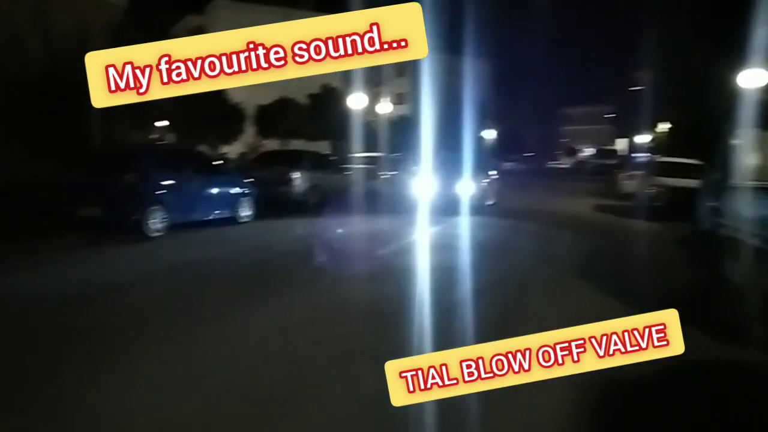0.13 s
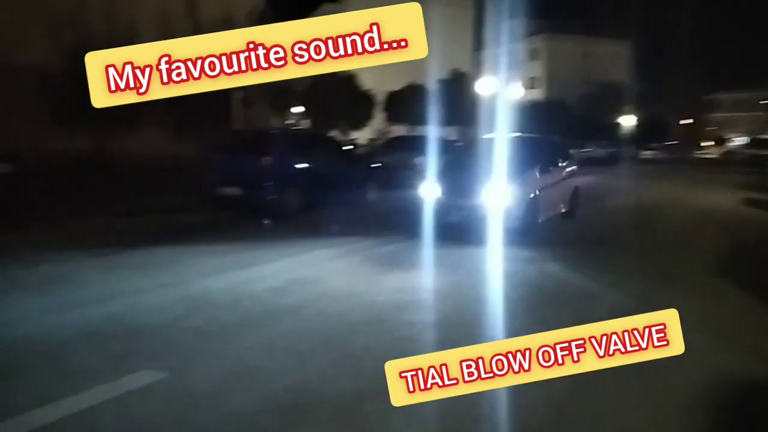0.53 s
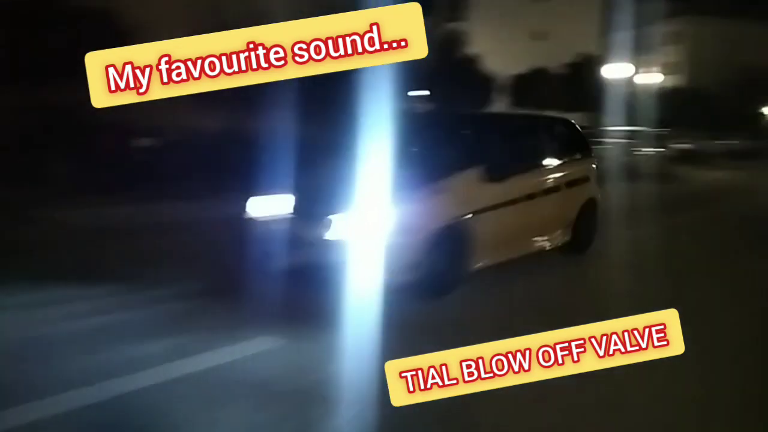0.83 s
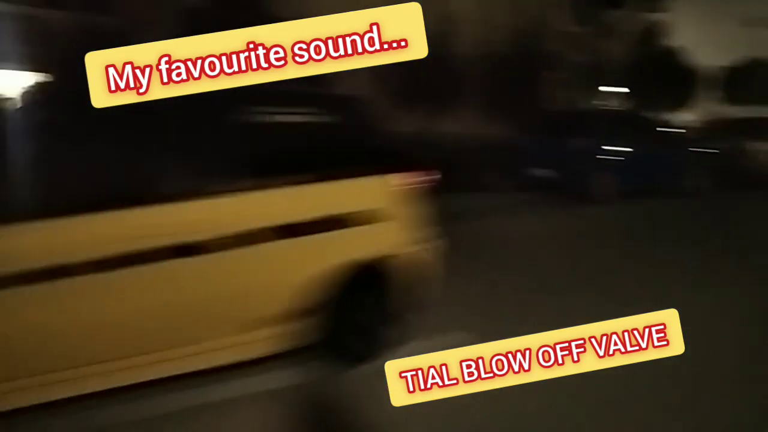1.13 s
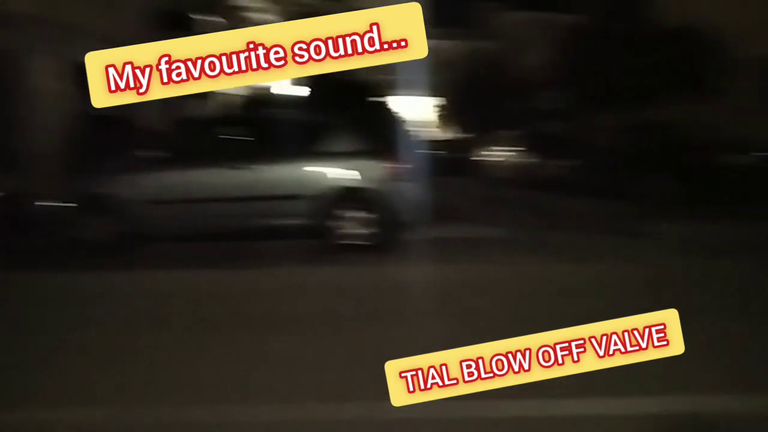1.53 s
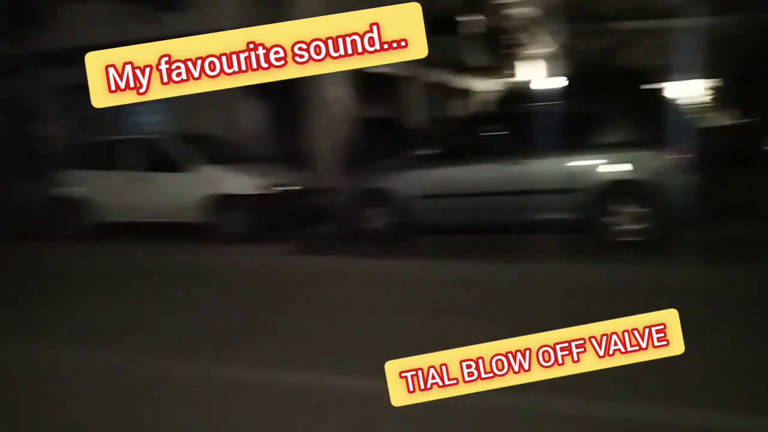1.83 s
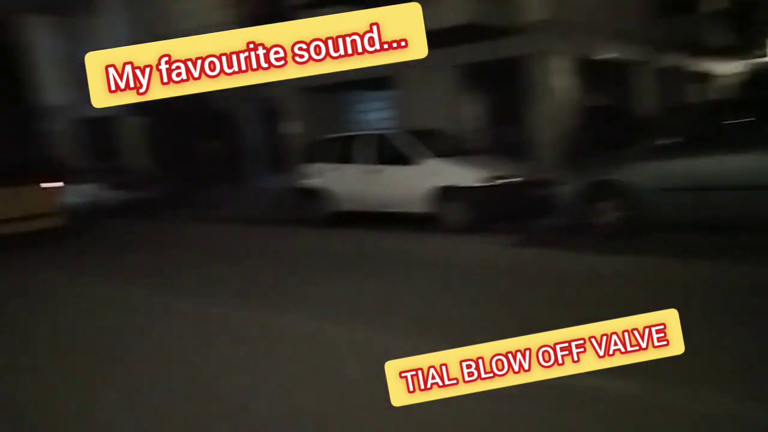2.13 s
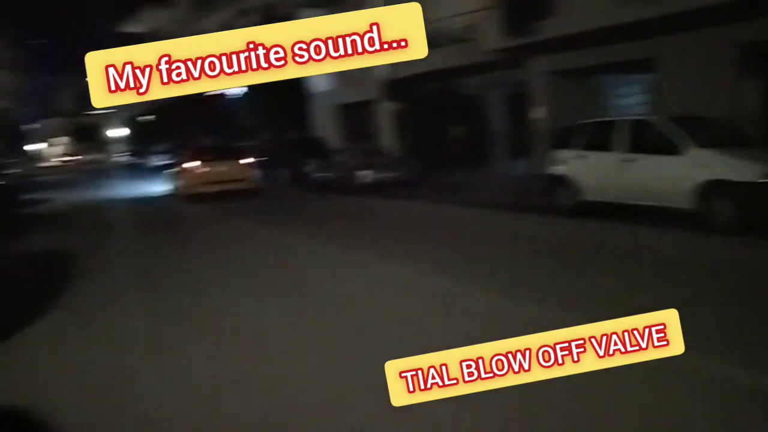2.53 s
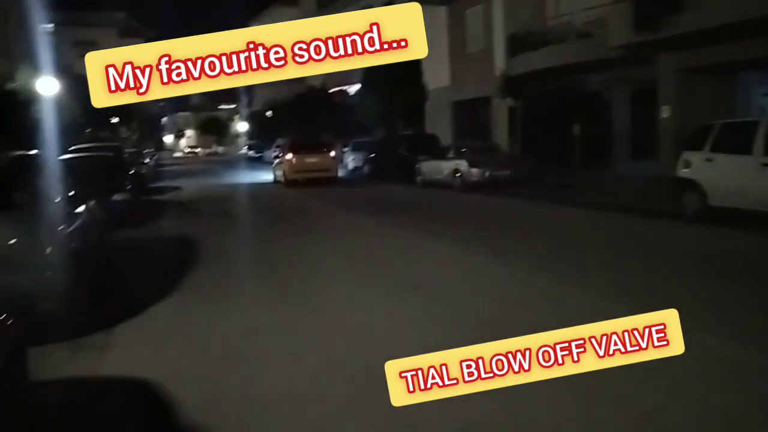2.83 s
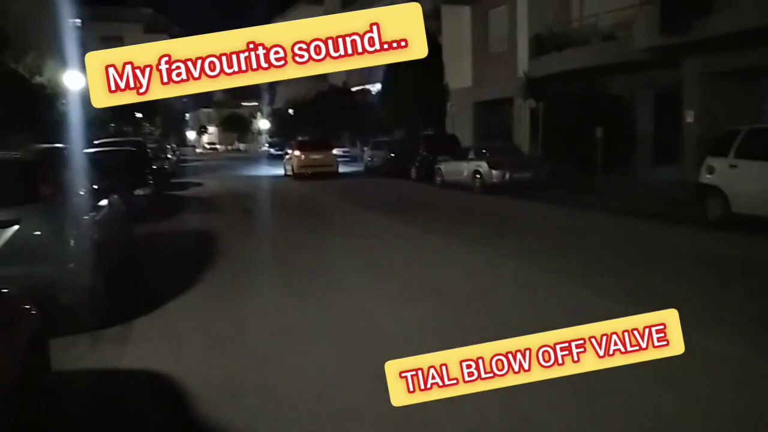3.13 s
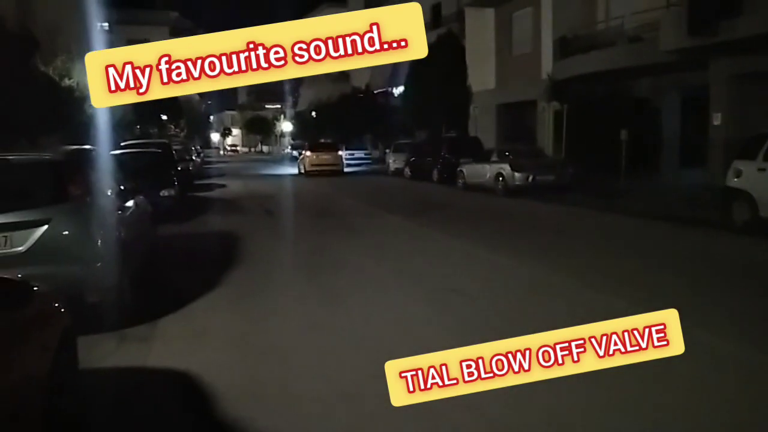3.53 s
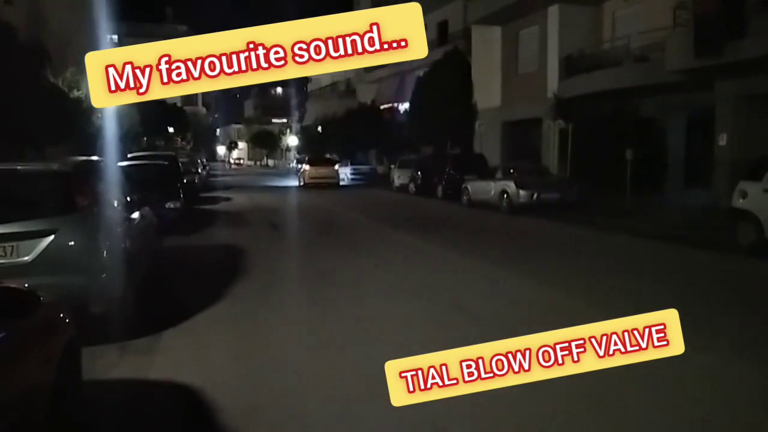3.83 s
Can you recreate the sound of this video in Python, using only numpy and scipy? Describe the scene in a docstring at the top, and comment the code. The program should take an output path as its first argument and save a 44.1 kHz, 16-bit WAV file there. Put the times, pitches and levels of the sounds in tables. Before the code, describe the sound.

A turbocharged car on full boost whistles high, lifts off with a sharp blast of vented air, sweeps close past a handheld microphone on a built-up street, then drones and burbles away.

```python
"""Turbo car lifts off and passes by

A turbocharged four-cylinder car comes down a night street on full boost and passes close by.
The throttle shuts: a valve vents with a long hiss of shaped noise and the turbo's sine whistle spins down.
The exhaust, a stack of cosines at the firing rate, drones as the tail swings past, then burbles unevenly.
Bands of shaped noise make the intake, tyres, wake and rumble; a few faint ticks sound near the microphone."""
import sys
import numpy as np
from scipy import signal
from scipy.fft import rfft, irfft
from scipy.io import wavfile
from scipy.ndimage import uniform_filter1d

SR = 44100
rng = np.random.default_rng(int(sys.argv[2]) if len(sys.argv) > 2 else 0)


def store_wav(level_fs):
    """Save 16-bit WAV to argv[1]."""
    pcm = np.round(np.clip(np.atleast_2d(level_fs), -1, 1) * 32767)
    wavfile.write(sys.argv[1], SR, pcm.T.astype(np.int16))


N = 176400
T = np.arange(N) / SR
LIFT_S = 0.23  # the moment the throttle starts to shut

# Firing rate of the engine as heard. Each row: time in seconds, rate in Hz.
FIRING_RATE = [(0, 152.5), (.06, 156.4), (.22, 158.6), (.28, 149), (.33, 123), (.43, 117), (.6, 107),
               (.87, 97), (1.07, 87.7), (1.25, 76.8), (1.5, 61), (1.62, 60), (1.89, 66.7), (2.12, 63),
               (2.3, 55), (2.6, 41.3), (2.8, 39.5), (3.26, 32.8), (3.48, 32), (4, 36)]
# Pitch of the turbo whistle. Each row: time in seconds, pitch in Hz.
WHISTLE_PITCH = [(0, 7600), (.08, 7740), (.22, 7860), (.265, 7620), (.32, 6960), (.39, 6300), (.5, 5480),
                 (.7, 4170), (.82, 3550), (1.22, 2420), (1.45, 1680)]
# Tone difference of the two microphone ports. Each row: frequency in Hz, left minus right in dB.
PORT_BALANCE = [(100, 2.5), (550, 2), (1000, -3.5), (1600, -1.5), (2500, -4.5), (3500, 1), (4300, -3),
                (5100, -8.5), (5800, -8.5), (7300, -8.5), (9000, -3), (11000, -1), (13700, 5.5)]
# Direction of the car. Each row: time in seconds, delay of the left port in ms.
LEFT_LAG = [(0, 0.15), (.9, 0.038), (1.35, 0.43), (1.6, 0.48), (4, 0.26)]


def amp(db):
    """Turns decibels into gain."""
    return 10 ** (np.asarray(db) / 20)


def unit(x):
    """Scales a signal to rms 1."""
    return x / np.sqrt(np.mean(x ** 2) + 1e-20)


def unit_of(x):
    """Rms of the middle (the mean of both sides) of a stereo pair."""
    return np.sqrt(np.mean(x.mean(0) ** 2) + 1e-20)


def curve(rows):
    """Reads a time table at every sample, with straight lines between its rows."""
    return np.interp(T, *np.transpose(rows))


def read(points, hz):
    """Reads a spectrum table on a log-frequency axis."""
    f, value = np.transpose(points)
    return np.interp(np.log(hz + 1), np.log(f + 1), value)


def port_gain(hz):
    """Gain of the left port at a frequency; the right port gets the inverse."""
    return amp(read(PORT_BALANCE, hz) / 2)


def drift(rate_hz):
    """Random motion of rms 1 that weakens above the given rate."""
    coarse = np.arange(0, N, 64)
    hz = np.fft.rfftfreq(len(coarse), coarse[1] / SR)
    spectrum = rfft(rng.standard_normal(len(coarse))) / (1 + (hz / rate_hz) ** 4)
    slow = irfft(spectrum, len(coarse))
    return np.interp(np.arange(N), coarse, unit(slow))


def rush(spectrum, patchy_db, size=512):
    """Turbulent noise at both ports, arriving from the direction of the car; its middle has rms 1."""
    # Likeness of the two ports. Each row: frequency in Hz, likeness from 0 to 1.
    likeness = [(350, 1), (650, 0.5), (1300, 0.34), (3400, 0.068), (5000, 0.26), (14000, .15)]
    hop = size // 4
    frames, hz = N // hop + 5, np.fft.rfftfreq(size, 1 / SR)
    a, b, c, d, patches = rng.standard_normal((5, frames, len(hz)))
    # smoothing over time and frequency leaves louder and softer patches
    patches = uniform_filter1d(patches, size=12, axis=0)
    patches = unit(uniform_filter1d(patches, size=7, axis=1))
    lag_s = np.interp(np.arange(frames) * hop / SR, *np.transpose(LEFT_LAG))[:, None] / 1000
    turn = np.exp(-2j * np.pi * hz * lag_s)  # delays the left port
    same, side = np.clip(read(likeness, hz), 0, 1), port_gain(hz)
    shared, separate = a + 1j * b, c + 1j * d
    left = shared * side * turn
    right = (same * shared + np.sqrt(1 - same ** 2) * separate) / side
    shaped = np.array([left, right]) * amp(read(spectrum, hz) + patchy_db * patches)
    _, x = signal.istft(shaped, nperseg=size, noverlap=size - hop, time_axis=-2, freq_axis=-1)
    x = x[:, :N]
    return x / unit_of(x)


def street(x, wet_db, t60):
    """Direct sound plus scattered echoes from house fronts and parked cars."""
    t = np.arange(SR // 2) / SR
    strength = rng.standard_normal((2, len(t)))
    present = rng.random((2, len(t))) < 2000 / SR  # about 2000 echoes per second
    taps = strength * present * amp(-60 * t / t60)
    taps /= np.linalg.norm(taps, axis=1, keepdims=True)
    echoes = signal.fftconvolve(x[None], taps, axes=1)[:, :N]
    return (x + amp(wet_db) * echoes) / np.hypot(1, amp(wet_db))


def throttle():
    """Gain of what sounds only under load: full until the lift, then falling at 342 dB per second."""
    return amp(-342 * np.maximum(T - LIFT_S, 0))


def firing_phase():
    """Angle in radians that turns once for every firing."""
    return 2 * np.pi * np.cumsum(curve(FIRING_RATE)) / SR


def handling():
    """Faint ticks close to the microphone: noise around a centre pitch that starts at once and dies away."""
    # Each row: start in seconds, level in dB, centre in Hz, decay time in seconds.
    ticks = [(2.328, -50.5, 6800, 0.0054), (3.341, -49.5, 6000, 0.00099), (3.764, -56, 1500, .012)]
    out = np.zeros((2, N))
    for start, db, hz, decay in ticks:
        # the spectrum falls away on both sides of its centre
        shape = [(hz / 4, -22), (hz, 0), (hz * 4, -44)]
        envelope = (T >= start) * np.exp(-abs(T - start) / decay)
        out += rush(shape, patchy_db=0, size=256) * amp(db) * envelope
    return out


def road():
    """Tyre roar near and far, the wake behind the car, and rumble that throbs with the firing."""
    # Tyres on asphalt. Each row: frequency in Hz, level in dB per Hz.
    tyre_tone = [(200, 7), (700, -0.5), (1200, 3), (1800, -2.5), (2400, -7), (3100, -8), (4500, -20),
                 (9000, -56)]
    # Level of the tyres. Each row: time in seconds, level in dB.
    tyre_level = [(0, -40), (.3, -32), (.6, -37.5), (.9, -34.5), (1.17, -34), (1.4, -43.5), (2.1, -46),
                  (3, -54), (4, -68)]
    # Far road roar that stays in the street. Each row: frequency in Hz, level in dB per Hz.
    far_tone = [(200, -2), (480, -2.5), (720, -11.5), (1250, 2.5), (1680, -19), (2000, -4.5), (2400, -23),
                (2750, -12.5), (3600, -22.5), (9000, -41)]
    # Breathy band heard from behind the car. Each row: frequency in Hz, level in dB per Hz.
    wake_tone = [(150, -3), (330, 11.5), (440, 8), (650, -13), (1100, -31), (1550, 2), (2050, 1.5),
                 (2600, -14), (3500, -12), (6000, -60)]
    # Rumble of road and exhaust gas. Each row: frequency in Hz, level in dB per Hz.
    rumble_tone = [(20, -27), (45, -8.5), (75, 5.5), (150, 8), (250, 0), (380, -6), (600, -30), (1200, -70),
                   (14000, -93)]
    # Level of the rumble. Each row: time in seconds, level in dB.
    rumble_level = [(0, -70), (.27, -37.5), (.55, -45), (1, -32.5), (1.5, -39), (2, -45), (2.6, -41.5),
                    (3, -46.5), (3.5, -46.5), (4, -45.5)]
    wake_peak_s, wake_width_s = 1.637, 0.39
    tyres = rush(tyre_tone, patchy_db=1.84) * amp(curve(tyre_level))
    far = rush(far_tone, patchy_db=2.5) * amp(-59)
    swell = np.exp(-.5 * ((T - wake_peak_s) / wake_width_s) ** 2)
    wake = rush(wake_tone, patchy_db=0.3, size=1024) * amp(-40) * swell
    rumble = rush(rumble_tone, patchy_db=1.0, size=2048) * amp(curve(rumble_level))
    throb = 1 + 0.13 * np.cos(firing_phase())
    return tyres + far + wake + rumble * throb


def intake():
    """Air drawn into the compressor, fluttering and rasping with the firings."""
    # Rush of air on boost. Each row: frequency in Hz, level in dB per Hz.
    intake_tone = [(130, -30), (300, 9), (600, 3.5), (2400, 2), (3200, 6.5), (6500, -4), (8500, 1.5),
                   (11500, -13), (14000, -13.5)]
    flutter = amp(-29 + 0.71 * drift(43))
    rasp = 1 + .45 * np.cos(firing_phase())
    return rush(intake_tone, patchy_db=2.5) * throttle() * flutter * rasp


def blow_off():
    """The valve opens with a bright blast, then keeps venting as the car goes by."""
    # First blast of the valve. Each row: frequency in Hz, level in dB per Hz.
    blast_tone = [(500, -42), (2900, -5), (3400, 2), (5000, 1.5), (6500, 1.5), (8500, -3.5), (10000, -5.5),
                  (12000, -10), (14000, -9.5)]
    # Long hiss of venting air. Each row: frequency in Hz, level in dB per Hz.
    vent_tone = [(500, -47), (2000, 0.5), (3300, 5), (4800, 1.5), (7000, 3), (8500, -1.5), (10000, -8.5),
                 (12000, -15.5), (14000, -15)]
    # Level of the long hiss. Each row: time in seconds, level in dB.
    vent_level = [(0, -32), (.3, -30), (.6, -35.5), (1.1, -36), (1.35, -44), (1.7, -50.5), (2.15, -55.5),
                  (2.5, -62.5), (3.3, -70.5)]
    rise_s, hold_s, fall_db_per_s = .045, 0.13, 33.5
    age = T - LIFT_S + rise_s / 2  # the rise is centred on the lift
    fade = amp(-27.5 - fall_db_per_s * np.maximum(age - hold_s, 0))
    envelope = np.clip(age / rise_s, 0, 1) * fade
    blast = rush(blast_tone, patchy_db=1.5) * envelope * amp(.9 * drift(30))
    vent = rush(vent_tone, patchy_db=1.0) * amp(curve(vent_level) + .5 * drift(25))
    return blast + vent


def hollow(x):
    """A narrow dip hollows the hiss while the car faces the microphone."""
    # Depth of the dip. Each row: time in seconds, share taken away from 0 to 1.
    depth = [(0, .5), (.3, .85), (.78, .8), (.95, 0)]
    centre_hz, width_hz = 2880, 330
    hz = np.fft.rfftfreq(N, 1 / SR)
    band = irfft(rfft(x) * np.exp(-(2 * (hz - centre_hz) / width_hz) ** 2), N)
    return x - curve(depth) * band


def breath(multiple):
    """A narrow band of noise around a multiple of the turbo's pitch, different at each port."""
    rate_hz = 150  # about half the width of the band
    hz = multiple * curve(WHISTLE_PITCH)
    angle = 2 * np.pi * np.cumsum(hz) / SR
    side = port_gain(hz)
    ports = []
    for gain in (side, 1 / side):
        band = drift(rate_hz) * np.sin(angle) + drift(rate_hz) * np.cos(angle)
        ports.append(gain * band)
    return np.array(ports)


def turbo_breath():
    """Air torn by the blades: a breathy band by the whistle, and its octave as the car draws level."""
    # Level of the band around the whistle. Each row: time in seconds, level in dB.
    band_level = [(0, -41), (.42, -32.5), (.6, -40), (.86, -34), (1, -45), (1.4, -57), (1.8, -100)]
    # Level of the octave band. Each row: time in seconds, level in dB.
    octave_level = [(.5, -66), (.9, -48), (1.24, -44), (1.45, -57), (1.8, -100)]
    return breath(0.95) * amp(curve(band_level)) + breath(2) * amp(curve(octave_level))


def turbo():
    """The compressor's blade tone, frayed by turbulence, climbs on boost and spins down after the lift."""
    # Level of the whistle. Each row: time in seconds, level in dB.
    whistle_level = [(0, -25.5), (.22, -35.5), (.26, -29.5), (.31, -43), (.39, -31), (.6, -42), (.7, -29.5),
                     (.8, -39), (1.2, -100)]
    fray, fray_hz = 0.6, 56  # depth as a share of the steady tone, and rate
    pitch = curve(WHISTLE_PITCH)
    wobbling = pitch * (1 + 0.00257 * drift(52.6))
    angle = 2 * np.pi * np.cumsum(wobbling) / SR
    blades = (1 + fray * drift(fray_hz)) * np.sin(angle) + fray * drift(fray_hz) * np.cos(angle)
    tone = amp(curve(whistle_level)) * unit(blades)
    side = port_gain(pitch)
    return street(tone, wet_db=-6.0, t60=0.167) * np.array([side, 1 / side])


def engine_under_load():
    """The hard note on boost: orders of the four-stroke cycle, in quarters of the firing rate."""
    # Pitch of each partial, in quarters of the firing rate.
    load_quarters = [6, 7, 9, 16, 20, 21, 23, 32, 33, 46, 47]
    # Level of each partial in dB, in the same order.
    load_level = [-39, -43, -41, -45.5, -29, -41, -39, -40, -41, -44, -33.5]
    phase, out = firing_phase(), np.zeros((2, N))
    for quarters, db in zip(load_quarters, load_level):
        order = quarters / 4
        angle = order * phase + 2 * np.pi * rng.random() + .3 * drift(10)
        # port gain and delay stay as they are at the start
        hz = order * FIRING_RATE[0][1]
        lag = 2 * np.pi * hz * LEFT_LAG[0][1] / 1000
        side = port_gain(hz)
        pair = np.array([side * np.cos(angle - lag), np.cos(angle) / side])
        out += amp(db) * (1 + .25 * drift(20)) * pair
    return np.sqrt(2) * out * throttle()


def exhaust():
    """Firing pulses as a harmonic stack; firings of uneven strength make the note burble at low speed."""
    # Levels of the first four harmonics, one list each. Each row: time in seconds, level in dB.
    harmonic_levels = [
        [(0, -25), (.04, -30), (.09, -20), (.14, -32), (.2, -21.5), (.32, -42), (.43, -23.5), (.59, -43.5),
         (.7, -31), (.82, -37), (.93, -26), (1.3, -18.5), (1.68, -27.5), (1.82, -23), (1.98, -33), (2.12, -23),
         (2.26, -38), (2.42, -37), (2.55, -45.5), (4, -62)],
        [(0, -32), (.24, -28.5), (.34, -48), (.8, -43), (1.2, -34.5), (1.53, -31), (1.72, -39.5), (2.3, -40),
         (2.55, -48), (2.75, -30.5), (2.84, -42), (2.96, -29), (3.12, -44.5), (3.26, -35.5), (4, -42)],
        [(0, -42.5), (1, -50.5), (1.12, -32), (1.6, -33), (2.12, -37), (2.9, -46), (4, -54)],
        [(0, -49), (.5, -51), (1.55, -44.5), (2, -57.5), (2.6, -46.5), (2.96, -39.5), (3.42, -42.5),
         (3.62, -40.5), (4, -45)],
    ]
    # Firings grow uneven off throttle. Each row: time in seconds, spread in dB.
    uneven = [(0, .3), (2.1, .5), (2.35, 3.5), (3.1, 3), (3.5, 1.5), (4, 1)]
    # Pulses are smeared in the drone, distinct in the burble. Each row: time in seconds, phase in radians.
    smear = [(2.1, 1.5), (2.6, .2)]
    silencer_hz, upper_db, upper_db_per_oct = 300, -5.5, -19.5
    alternate = 0.22  # share of the spread that alternates strong and weak
    jitter = 0.054  # timing jitter in radians per dB of spread
    waver = 0.093  # depth of the level's wavering; higher harmonics waver more
    phase, hz, spread = firing_phase(), curve(FIRING_RATE), curve(uneven)
    levels = [curve(rows) for rows in harmonic_levels]
    # harmonics 5 to 10 follow the fourth, cut further by the silencer
    for k in range(5, 11):
        slope = upper_db + upper_db_per_oct * np.log2(k / 5)
        silencer = -10 * np.log10(1 + (k * hz / silencer_hz) ** 2)
        levels.append(levels[3] + slope + silencer)
    # a random strength for each firing, gliding from one to the next
    chance = np.interp(phase / (2 * np.pi), np.arange(N), rng.uniform(-1.3, 1, N))
    strength = amp(spread * (chance + alternate * np.cos(phase / 2)))
    angle = phase + jitter * spread * drift(13)
    ports = np.array([angle - 2 * np.pi * hz * curve(LEFT_LAG) / 1000, angle])
    out = np.zeros((2, N))
    for k, db in enumerate(levels, 1):
        level = amp(db) * (1 + waver * np.sqrt(k) * drift(8.8))
        out -= level * np.cos(k * ports - curve(smear) * (k - 1) ** 2)
    return np.sqrt(2) * out * strength


def scene():
    """Adds up the street and the car."""
    hiss = hollow(intake() + blow_off() + road())
    whistle = turbo() + turbo_breath()
    return handling() + hiss + whistle + engine_under_load() + exhaust()


def record(dry):
    """The recorder's band limit: a low-pass filter at 14400 Hz."""
    low_pass = signal.firwin(601, 14400, window=("kaiser", 9), fs=SR)
    return signal.oaconvolve(dry, low_pass[None], "same")


dry = scene()
out = record(dry)
store_wav(out)
```